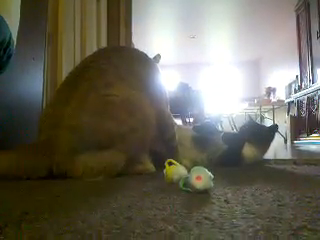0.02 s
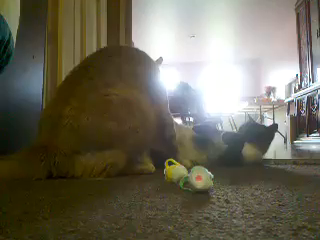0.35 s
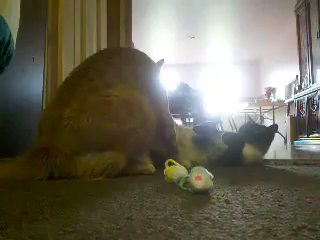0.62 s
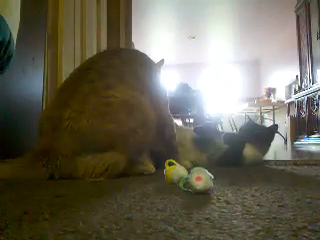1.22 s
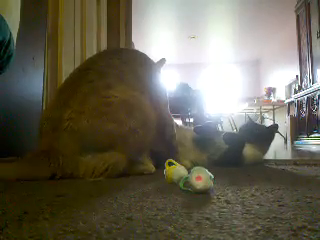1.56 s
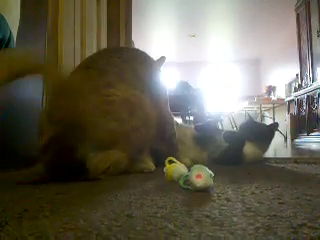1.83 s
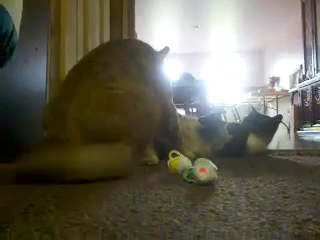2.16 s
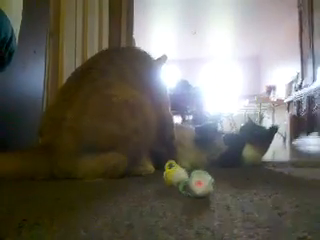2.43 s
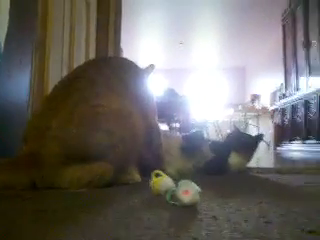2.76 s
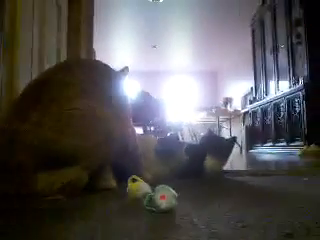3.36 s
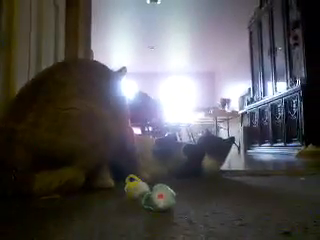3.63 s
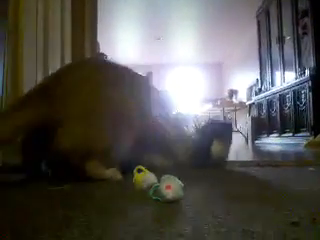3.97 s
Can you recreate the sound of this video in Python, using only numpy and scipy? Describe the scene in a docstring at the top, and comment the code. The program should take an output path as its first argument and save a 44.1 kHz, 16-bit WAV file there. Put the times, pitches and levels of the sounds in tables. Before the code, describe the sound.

Close handling noise on a microphone indoors: after a cat's faint whine and a few dry taps over a low hum, hissing, scratchy friction builds into a flurry of hard knocks, then trails off.

```python
"""A small camera lies on the carpet of a quiet, humming room; a cat's faint whine sinks and dies away
among a few dry knocks on the case. Near 2 s something brushes over the camera with a hiss.
Then it is shifted: rasping strokes of friction and a flurry of knocks, each a damped swing of the case.
The hardest, near 3.4 s, push its gain down, and a last soft stroke trails off.
Throughout, its two microphone ports are cross-subtracted for stereo."""
import sys
import numpy as np
from scipy import signal
from scipy.fft import rfft, irfft
from scipy.io import wavfile
from scipy.ndimage import uniform_filter1d, minimum_filter1d

SR = 44100
rng = np.random.default_rng(int(sys.argv[2]) if len(sys.argv) > 2 else 0)


def pcm_store(signal):
    """Save signal as 16-bit PCM."""
    levels = np.round(np.clip(np.atleast_2d(signal), -1, 1) * 32767)
    wavfile.write(sys.argv[1], SR, levels.astype(np.int16).T)


N = 176400
TIME = np.arange(N) / SR


def from_db(db):
    """Decibels to gain."""
    return 10 ** (np.asarray(db) / 20)


def rms_one(x):
    """Scale to rms 1."""
    return x / np.sqrt(np.mean(x ** 2) + 1e-20)


def noise(spectrum, channels=2, source=None):
    """Independent noises (or a given source) coloured by rows of freq_hz, gain_db; rms 1."""
    hz, db = np.transpose(spectrum)
    f = np.maximum(np.fft.rfftfreq(N, 1 / SR), 1)
    gain = from_db(np.interp(np.log(f), np.log(hz), db)) * np.minimum(f / hz[0], 1) ** 2
    source = rng.standard_normal((channels, N)) if source is None else source
    return rms_one(irfft(rfft(source) * gain, N))


def drift(rate_hz):
    """A smooth random wobble up to about rate_hz, rms 1."""
    lowpass = signal.butter(2, rate_hz, fs=SR, output="sos")
    return rms_one(signal.sosfilt(lowpass, rng.standard_normal(N + SR))[SR:])


def two_pole(x, hz, q, band=False):
    """Resonant low-pass, or band-pass if band is set."""
    w = 2 * np.tan(np.pi * hz / SR)
    return signal.lfilter(*signal.bilinear([w, 0] if band else [w * w], [1, w / q, w * w]), x)


def room_tone(hum_db=-50.5, waver_db=0.74, diffuse_db=-58):
    """A bed of hum and air that swells and ebbs alike at both ports, plus a wash that differs at each."""
    # colours of the hum and the wash: freq_hz, gain_db
    hum_colour = [(40, -15), (90, 0.5), (170, -2.5), (320, 3), (600, -12), (1050, -15.5), (1500, -31.5),
                  (2000, -45), (3500, -47.5), (7000, -42.5), (12500, -40.5)]
    diffuse_colour = [(40, -14), (90, -4), (320, 3), (600, -4), (1050, -2.5), (2000, -15.5), (3500, -20),
                      (7000, -20), (12500, -18.5)]
    # slow swell of the hum: time_s, gain_db
    swell = [(0, -1), (.8, 1.5), (1.3, 0), (1.8, -0.5), (3.2, 0.5), (4, -4)]
    level = from_db(hum_db + np.interp(TIME, *np.transpose(swell)) + waver_db * drift(24))
    return level * noise(hum_colour, channels=1) + from_db(diffuse_db) * noise(diffuse_colour)


def cat_whine(jitter=0.013, shimmer_db=4, mouth_ratio=1.57, mouth_width_hz=48, mouth_db=-0.5):
    """A thin, unsteady whine whose breathy mouth resonance sinks with the pitch."""
    # falling glide: time_s, pitch_hz
    glide = [(0, 696), (.2, 690.6), (.35, 675), (.55, 654)]
    # fade of the voice: time_s, level_db
    fade = [(0, -56), (.3, -59), (.46, -62), (.6, -66)]
    # overtones: harmonic_number, level_db
    partials = [(3, -16), (4, -43), (5, -30), (6, -23)]
    pitch = np.interp(TIME, *np.transpose(glide)) * (1 + jitter * drift(50))
    phase = 2 * np.pi * np.cumsum(pitch) / SR
    tone = sum(from_db(db + shimmer_db * drift(9.1)) * np.sin(k * phase) for k, db in partials)
    # the fundamental hoots through near the end
    hoot = from_db(8) * np.exp(-((TIME - 0.434) / 0.085) ** 2) * np.sin(phase)
    mouth_phase = mouth_ratio * phase
    breath = drift(mouth_width_hz) * np.sin(mouth_phase) + drift(mouth_width_hz) * np.cos(mouth_phase)
    level = from_db(np.interp(TIME, *np.transpose(fade), right=-120))
    return level * (tone + hoot + from_db(mouth_db) * breath / np.sqrt(2))


def gritty_rasp(slips_per_s=350, spread_db=6.5, grit_db=-7):
    """Friction noise with the grit of fibres that catch and slip, coloured by the case."""
    # colour of the friction: freq_hz, gain_db
    colour = [(40, -25.5), (90, -13), (200, -1.5), (450, -4.5), (800, -6.5), (1300, -10.5), (2000, -14),
              (3000, -21), (4800, -21.5), (7000, -35), (12500, -32)]
    # case resonances: freq_hz, q, gain_db
    resonances = [(220, 9.7, -4), (564, 13, -10), (1020, 12, 0), (1600, 8, -6)]
    slips = (rng.random((2, N)) < slips_per_s / SR) * rng.choice([-1, 1], (2, N))
    strength = from_db(spread_db * np.minimum(rng.exponential(1, (2, N)), 4))
    friction = noise(colour) + from_db(grit_db) * noise(colour, source=slips * strength)
    body = sum(from_db(db) * two_pole(friction, hz, q, band=True) / q for hz, q, db in resonances)
    return rms_one(friction + body)


def rubbing(hiss_flutter_db=0.65, rasp_flutter_db=2.0, edge_db=-8.5, fade_s=0.0034):
    """Strokes swell and ebb with pressure: smooth hiss over a low rasp, independent at the two ports."""
    # strokes over the case, plus one row (from 2.757 s) that is the lingering rattle after the knock at 2.762
    # s: start_s, peak_s, end_s, hiss_db, hiss_top_hz, rasp_db
    strokes = [(1.884, 1.982, 2.14, -49, 12700, -49.5), (2.193, 2.254, 2.325, -46, 9200, -55),
               (2.27, 2.284, 2.4, -34, 15500, -45.5), (2.404, 2.536, 2.68, -35.5, 8400, -37.5),
               (2.678, 2.716, 2.79, -40.5, 9200, -45), (2.757, 2.782, 2.824, -59, 8000, -33),
               (2.809, 2.814, 2.86, -45.5, 11000, -46), (2.856, 2.88, 2.895, -48, 8000, -33.5),
               (2.889, 2.904, 2.918, -41.5, 9300, -35.5), (2.965, 2.971, 2.986, -40, 11000, -29.5),
               (2.991, 3.054, 3.143, -53, 7000, -34), (3.12, 3.157, 3.188, -45.5, 4340, -34),
               (3.207, 3.242, 3.32, -56, 7800, -44), (3.319, 3.327, 3.35, -52.5, 8900, -51),
               (3.393, 3.403, 3.41, -48, 6500, -42.5), (3.588, 3.621, 3.705, -42.5, 5560, -45.5),
               (3.705, 3.723, 4.16, -61.5, 5014, -66)]
    # colour of the hiss: freq_hz, gain_db
    hiss_colour = [(800, -23), (1600, -3), (2300, -11), (3000, -11), (4200, -13), (5500, 0), (7400, 2.5),
                   (8400, 1.5), (9800, -2), (12500, -8)]
    hiss = noise(hiss_colour) * from_db(hiss_flutter_db * drift(45))
    rasp = gritty_rasp() * from_db(rasp_flutter_db * drift(130))
    ports = np.zeros((2, N))
    for start, peak, end, hiss_db, top_hz, rasp_db in strokes:
        swell = from_db(np.interp(TIME, [start, peak, end], [edge_db, 0, edge_db]))
        outside_s = np.maximum(np.maximum(start - TIME, TIME - end), 0)
        pressure = swell * np.exp(-np.minimum(outside_s / fade_s, 20))
        stroke_hiss = rms_one(two_pole(hiss, top_hz, q=1.2))  # a slight peak just under its top
        ports += pressure * (from_db(hiss_db) * stroke_hiss + from_db(rasp_db) * rasp)
    return ports / np.sqrt(2)


def case_knocks(crack_t60_s=0.0061, rattle_t60_s=0.032):
    """Each knock is a heavily damped swing and ring of the case at one port, a crack and rattle at both."""
    # hits on the case: start_s, level_db, pitch_hz, crack_db, rattle_db (last two relative to the hit)
    hits = [(0.0504, -22.5, 930, -12, -16), (0.1443, -43, 400, -22, -22), (.6720, -19, 700, -15, -4),
            (0.9495, -37, 380, -29, -25), (1.866, -44.5, 400, 8, -17), (1.9747, -21, 1120, 3.5, -13),
            (2.3880, -23.5, 430, -16, -11), (2.4817, -22.5, 354, -32, -27),
            (2.7623, -5.5, 1070, -11, -20.5), (2.8445, -11, 1160, -26, -14.5),
            (2.8534, -16.5, 1130, -28, -8.5), (2.8695, -9.5, 485, -39, -14), (2.9406, -11.5, 746, -30, -14),
            (2.9415, -8, 1720, -10.5, -24.5), (2.9672, -13, 520, -17, -10), (3.303, -25, 251, -38, -35),
            (3.3754, 12, 650, -32.5, -28), (3.3905, -13, 520, -27.5, -13), (3.41, 10, 720, -42.5, -23),
            (3.4214, 3, 530, -33.5, -22), (3.431, -11, 600, -24.5, -12.5), (3.4402, -15.5, 400, -21.5, -14),
            (3.4595, 12, 864, -40, -25), (3.4706, 8, 880, -39.5, -25.5), (3.4824, 5.5, 800, -44, -24),
            (3.5495, 6.5, 820, -37, -29.5)]
    # ring of the case: freq_hz, relative_db, t60_s
    modes = [(220, -28.5, .03), (540, -23.5, 0.012), (861, -18.5, 0.0059), (1270, -29.5, 0.015),
             (3620, -36.5, 0.0049)]
    # colours of the bright crack and the duller rattle: freq_hz, gain_db
    crack_colour = [(800, -25), (2000, -5.5), (4000, 2.5), (8000, 4.5), (13000, -1)]
    rattle_colour = [(80, -14.5), (250, 6.5), (600, 2), (1100, 1.5), (1800, -8), (3000, -24), (9000, -31.5)]
    ports, t = np.zeros((2, N)), TIME[:SR // 10]
    crack_noise, rattle_noise = noise(crack_colour), noise(rattle_colour)
    for start, level_db, pitch_hz, crack_db, rattle_db in hits:
        span = slice(int(start * SR), int(start * SR) + len(t))
        swing = two_pole(1. * (t == 0), pitch_hz, q=0.84, band=True)
        # the soft contact rounds off the top in two stages
        swing = two_pole(swing, 1.256 * pitch_hz, q=0.86)
        swing = signal.sosfilt(signal.butter(1, 2.3 * pitch_hz, fs=SR, output="sos"), swing)
        ring = sum(from_db(db + 2 * rng.standard_normal() - 60 * t / t60) * np.sin(2 * np.pi * hz * t)
                   for hz, db, t60 in modes)
        crack = crack_noise[:, span] * from_db(crack_db - 60 * t / crack_t60_s)
        rattle = rattle_noise[:, span] * from_db(rattle_db - 60 * t / rattle_t60_s)
        hit = (crack + rattle) / np.sqrt(2)
        hit[0] += ring - swing / np.abs(swing).max()
        ports[:, span] += from_db(level_db) * hit
    return ports


def cross_subtract(ports, lag_samples=15):
    """Each channel is one port minus the other, delayed; less is subtracted in the treble."""
    # how much of the other port is subtracted: freq_hz, share
    cancellation = [(4400, 1), (6000, 0.22), (13000, 0.36)]
    f = np.fft.rfftfreq(2 * N, 1 / SR)
    share = np.interp(f, *np.transpose(cancellation))
    delay = np.exp(-2j * np.pi * f * lag_samples / SR)
    return ports - irfft(rfft(ports[::-1], 2 * N) * share * delay)[:, :N]


def scene():
    """Sound at the two microphone ports."""
    return room_tone() + cat_whine() + rubbing() + case_knocks()


def record(dry, ceiling_db=1, recover_db_per_s=1, cutoff_hz=14000):
    """Stereo from the two ports, a slowly recovering limiter, clipping and a steep top cut."""
    stereo = cross_subtract(dry)
    over_db = np.maximum(20 * np.log10(np.abs(stereo).max(axis=0) + 1e-9) - ceiling_db, 0)
    recovery_db = recover_db_per_s * TIME
    held_db = np.maximum.accumulate(over_db + recovery_db) - recovery_db
    # the gain eases down just ahead of each peak
    gain_db = uniform_filter1d(minimum_filter1d(-held_db, size=129), size=129)
    clipped = np.clip(stereo * from_db(gain_db), -1, 1)
    return signal.sosfilt(signal.ellip(12, .1, 60, cutoff_hz, fs=SR, output="sos"), clipped)


dry = scene()
out = record(dry)
pcm_store(out)
```